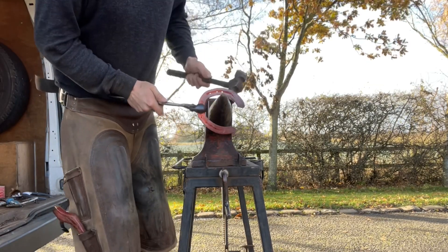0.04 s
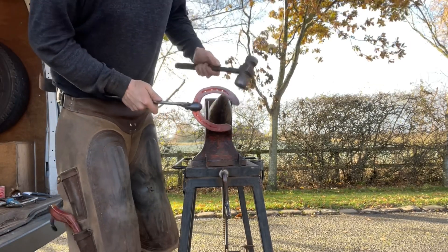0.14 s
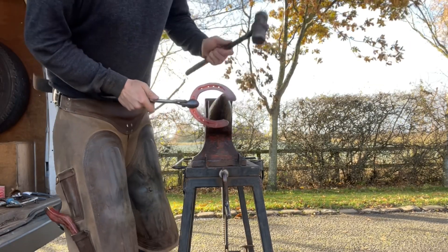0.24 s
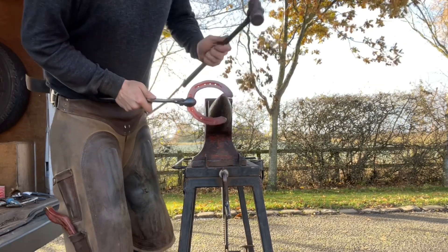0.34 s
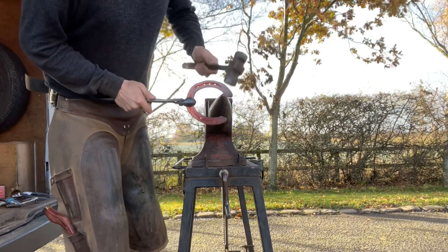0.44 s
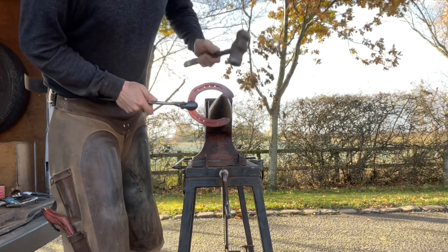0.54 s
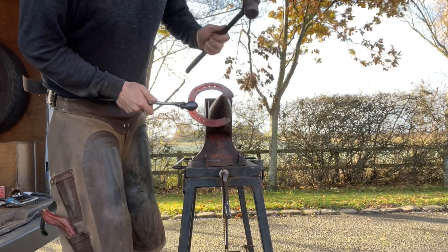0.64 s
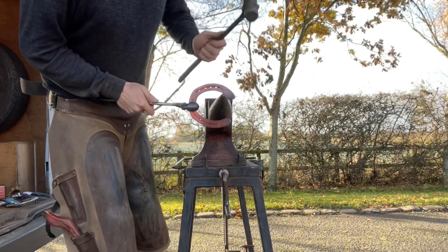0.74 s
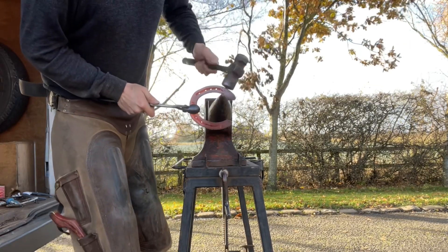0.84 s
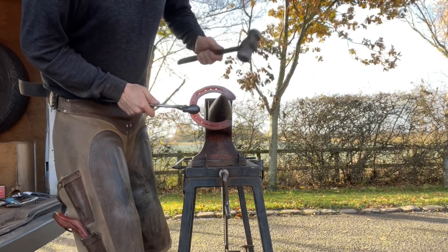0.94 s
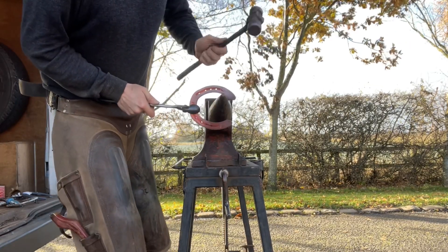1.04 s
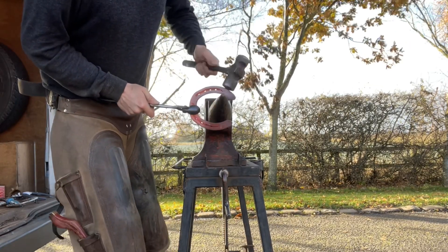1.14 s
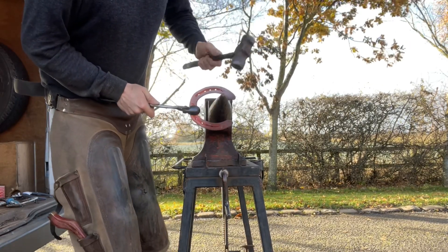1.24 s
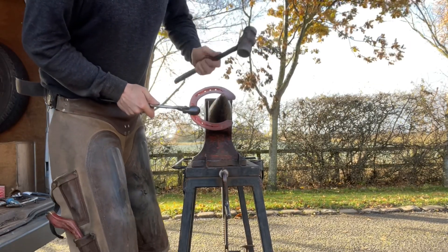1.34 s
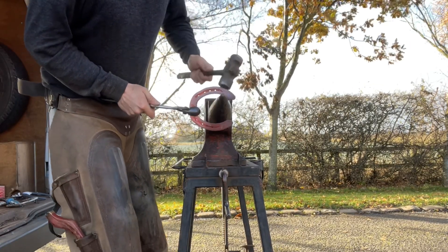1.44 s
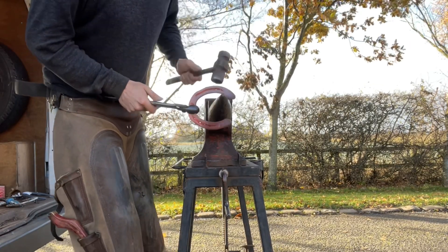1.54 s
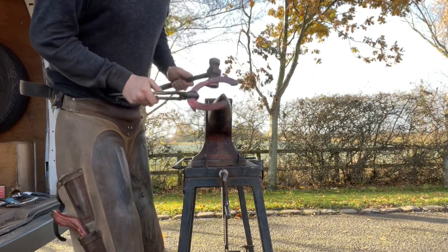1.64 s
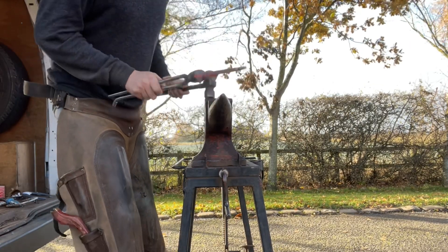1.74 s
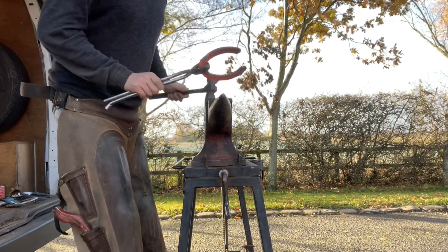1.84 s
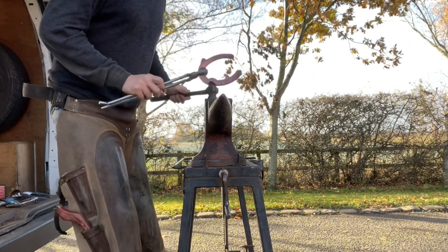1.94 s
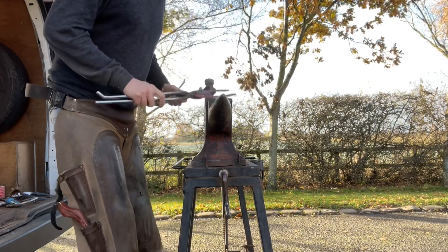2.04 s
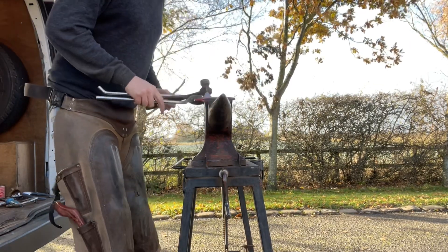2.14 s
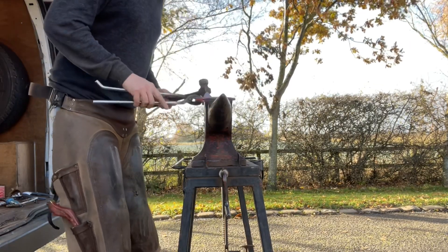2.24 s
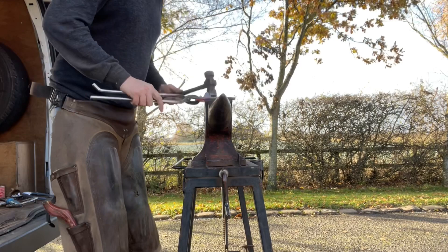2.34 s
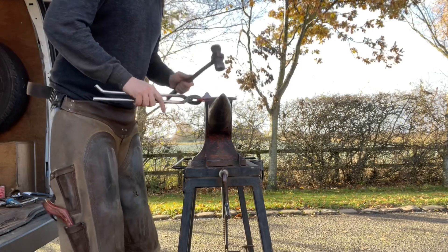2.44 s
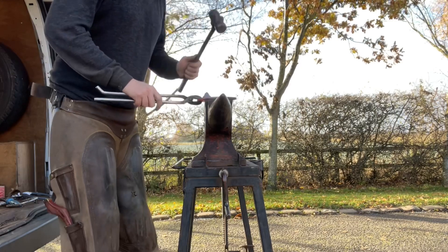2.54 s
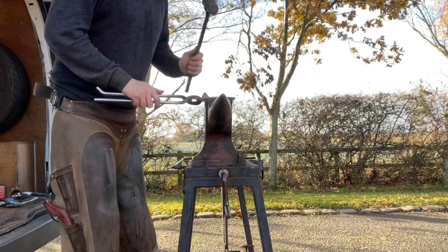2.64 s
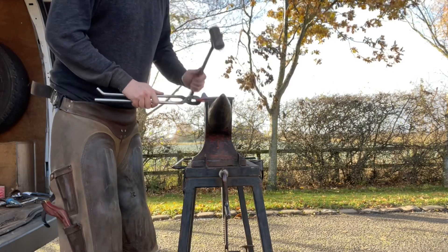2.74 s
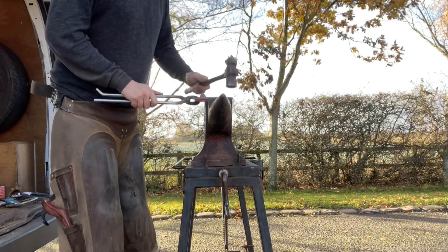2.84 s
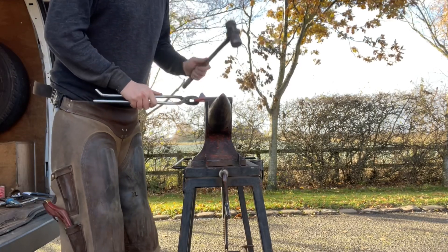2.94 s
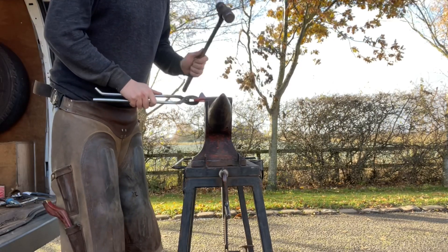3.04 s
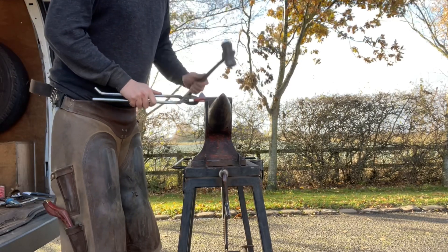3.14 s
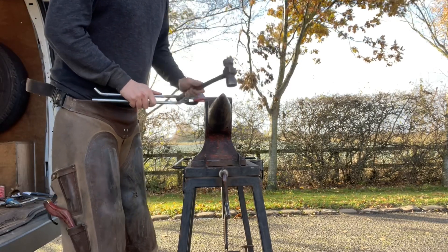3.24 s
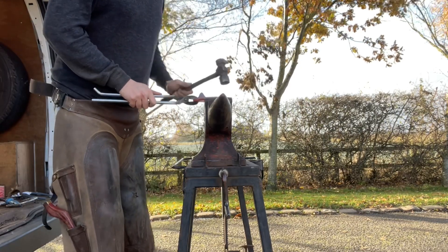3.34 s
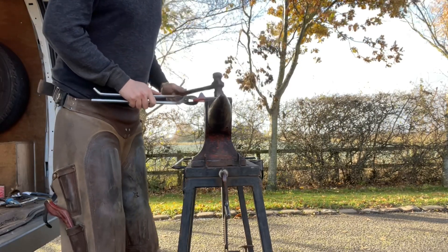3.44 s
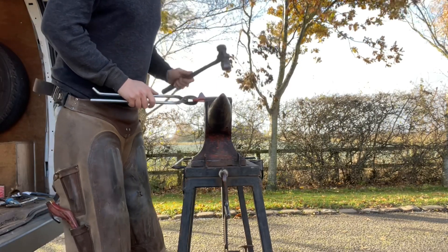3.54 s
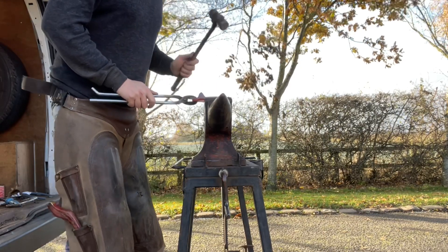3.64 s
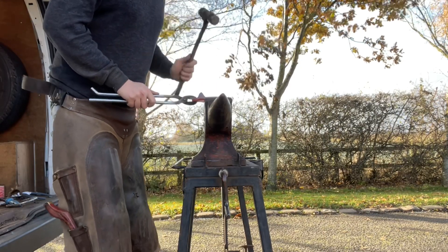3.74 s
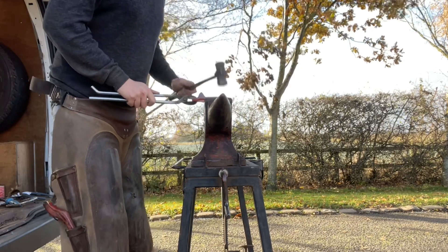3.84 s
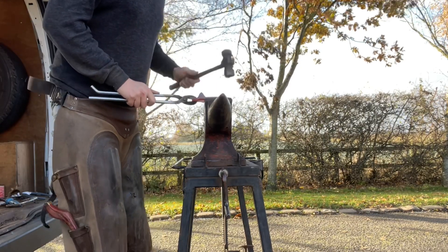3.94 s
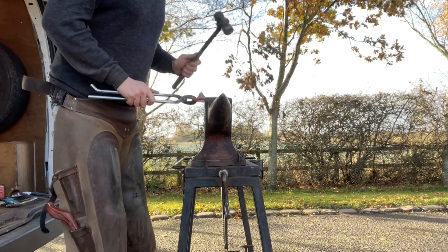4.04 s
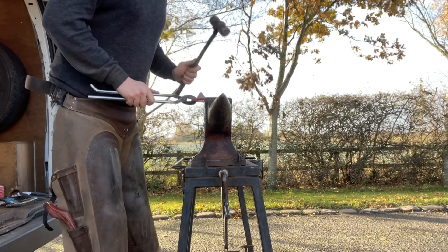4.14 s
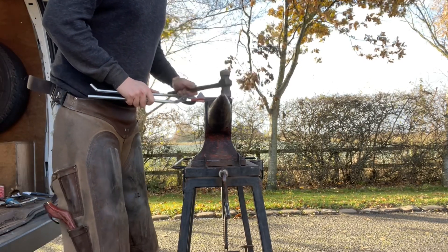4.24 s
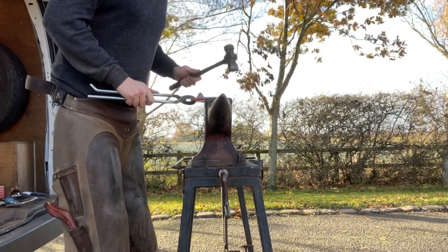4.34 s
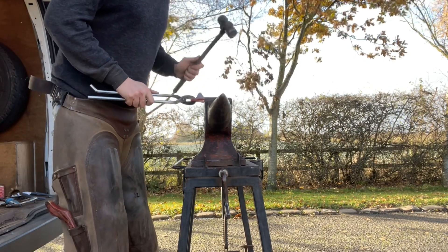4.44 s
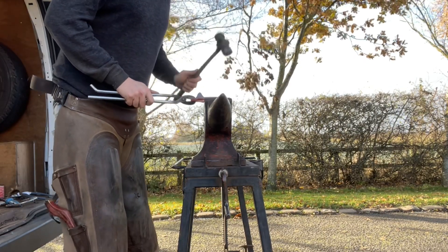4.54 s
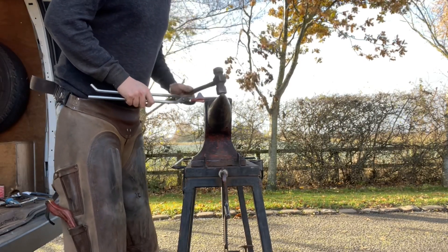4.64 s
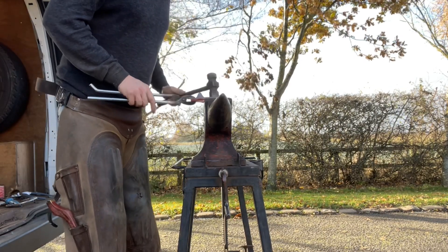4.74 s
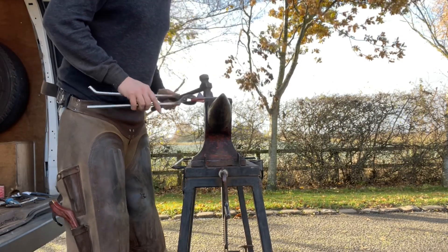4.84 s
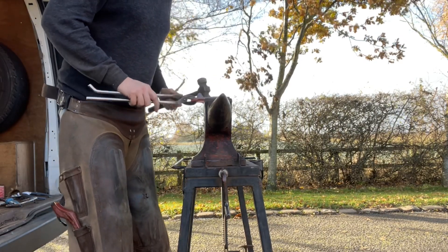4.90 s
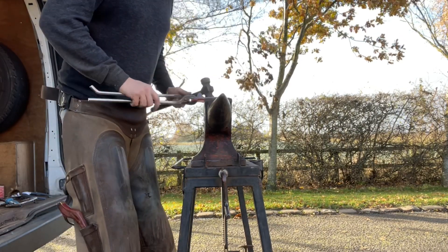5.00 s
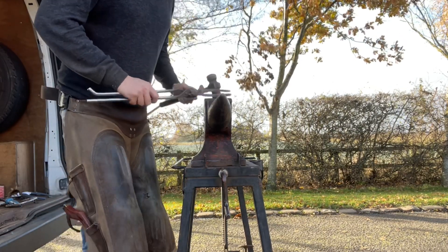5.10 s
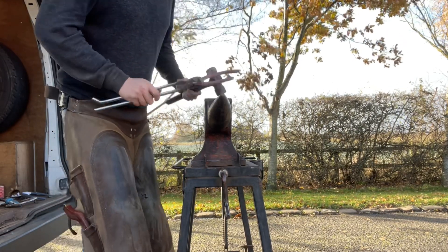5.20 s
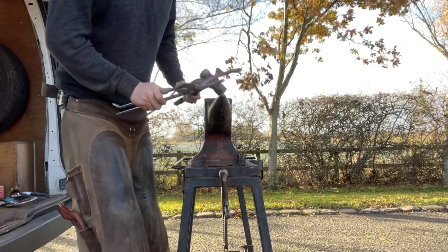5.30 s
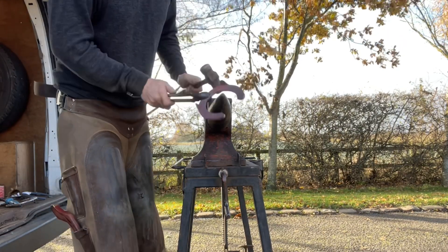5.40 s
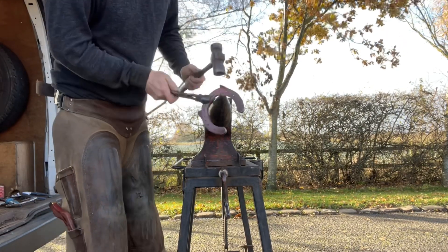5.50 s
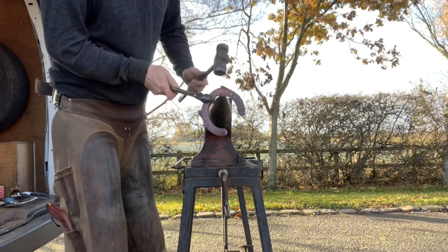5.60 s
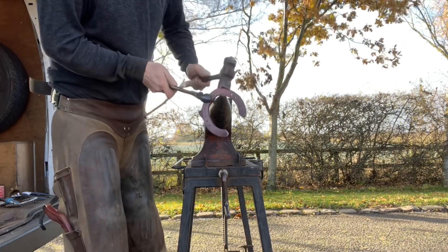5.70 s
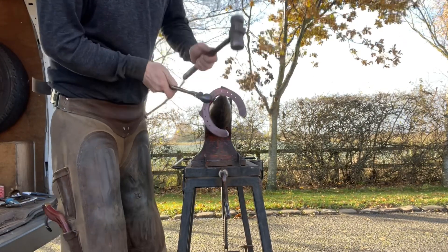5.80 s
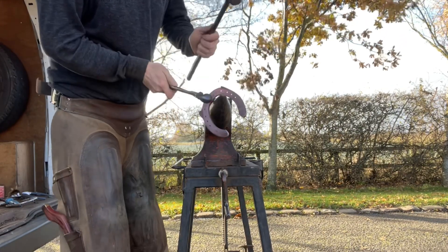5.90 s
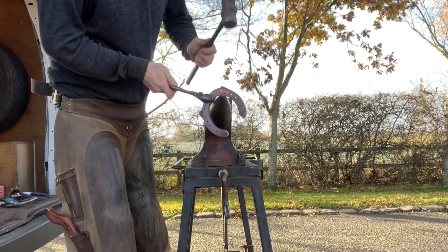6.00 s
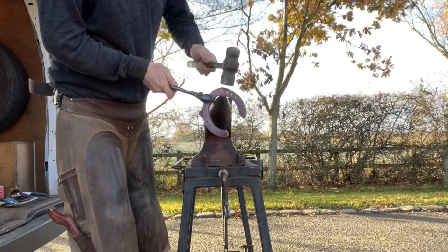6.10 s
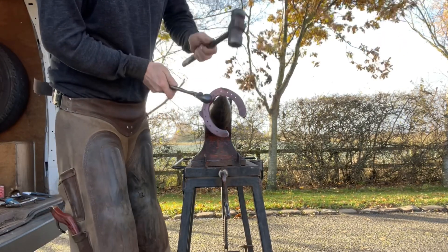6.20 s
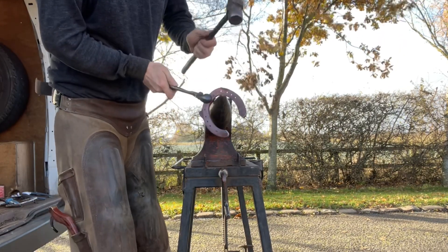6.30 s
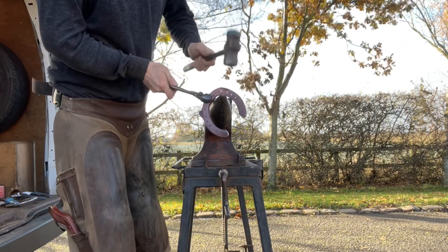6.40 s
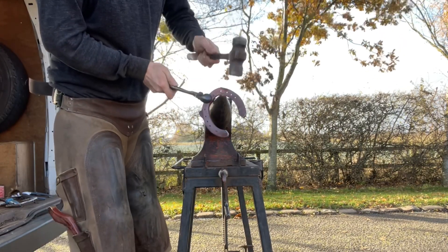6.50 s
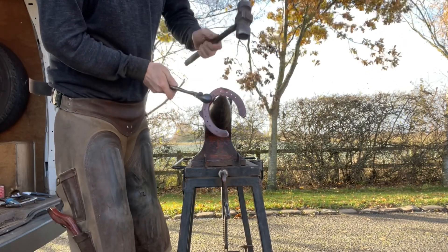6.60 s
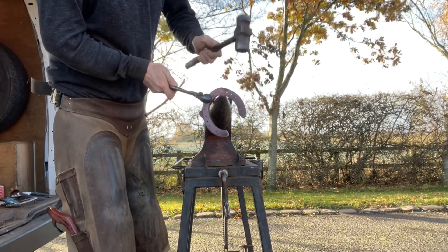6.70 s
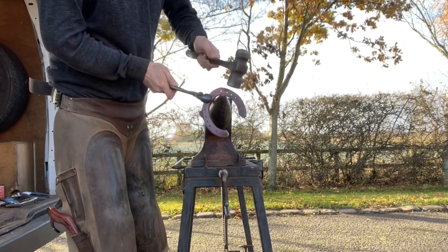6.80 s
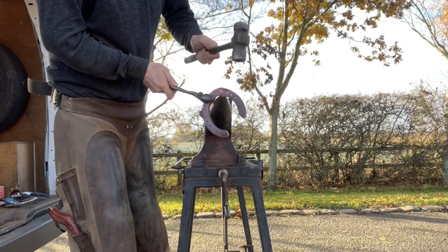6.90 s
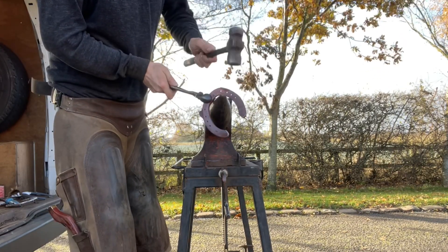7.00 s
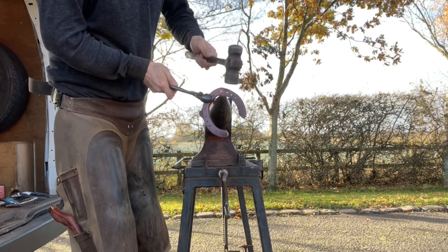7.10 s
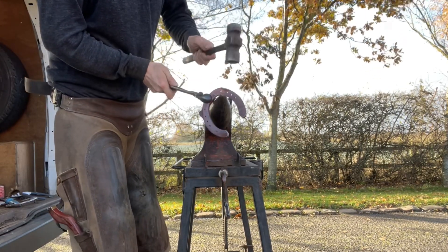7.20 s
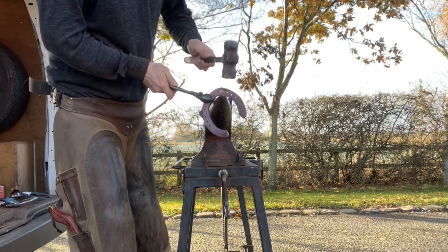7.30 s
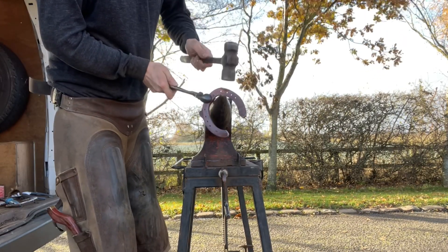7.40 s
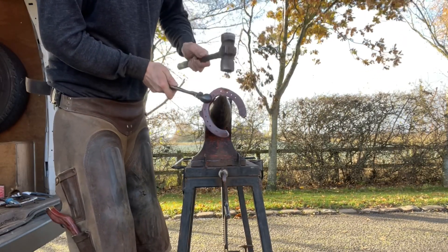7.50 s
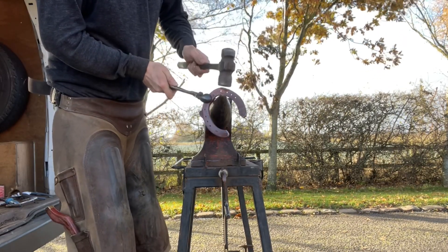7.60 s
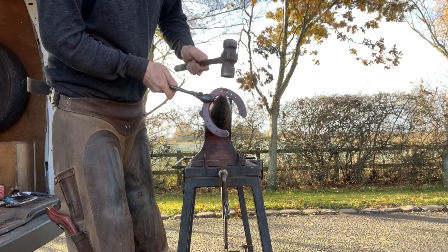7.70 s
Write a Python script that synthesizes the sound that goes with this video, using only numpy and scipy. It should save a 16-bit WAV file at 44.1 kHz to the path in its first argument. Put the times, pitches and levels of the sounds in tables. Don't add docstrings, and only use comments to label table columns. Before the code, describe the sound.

A steel hammer cracks against a soft hot shoe, the anvil ringing briefly around each hit. Four blows, a fast dwindling bounce on the bare face, small clinks of tongs, six hard sharp blows, a cluster of bright pinging taps, then seven steadier blows that get lighter. Open yard beside a van gives quick reflections and a short tail; low wind gusts buffet the nearby stereo phone over faint leaves.

```python
import sys
import numpy as np
from scipy import signal
from scipy.fft import rfft, irfft, next_fast_len
from scipy.io import wavfile
from scipy.ndimage import uniform_filter1d, minimum_filter1d

SR = 44100
rng = np.random.default_rng(int(sys.argv[2]) if len(sys.argv) > 2 else 0)


def transcribe(u):
    v = np.clip(np.atleast_2d(u).T, -1, 1)
    q = np.round(v * 32767).astype(np.int16)
    wavfile.write(sys.argv[1], SR, q)


def nominal_scale(level):
    x = np.asarray(level, float) / 20
    return 10 ** x


N = 341775

# time [s], buffet level [dB].
BREEZE = [(0, -54), (1.05, -59.5), (1.5, -48), (2.05, -49.5), (2.5, -53), (2.82, -56.5), (3.1, -48),
          (3.42, -57), (3.52, -59), (3.85, -49.5), (4.35, -54.5), (4.7, -42), (5.35, -55), (5.66, -45),
          (5.76, -77.5), (6.05, -58), (6.35, -52), (7.75, -57)]


def evened(x):
    return x / np.sqrt(np.mean(x ** 2) + 1e-20)


def read(points, hz):
    f, value = np.transpose(points)
    return np.interp(np.log(hz + 1), np.log(f + 1), value)


def add(mix, start_s, sound):
    part = mix[round(start_s * SR):][:len(sound)]
    part += sound[:len(part)]


def coloured(x, gain):
    size = next_fast_len(x.shape[-1])
    return irfft(rfft(x, size) * gain(np.fft.rfftfreq(size, 1 / SR)), size)[..., :x.shape[-1]]


def ring(pitches_hz, modes, t, lasting, scatter_db, detune=0, hold_s=0):
    hz = np.c_[pitches_hz]
    db, t60_s = np.transpose(modes)[:, :, None]
    spot, sign, grip = rng.standard_normal((3, len(modes), 1))
    sign[:2] = 1
    level = nominal_scale(db + scatter_db * spot - 60 * np.maximum(t - hold_s, 0) / (t60_s * lasting))
    tones = np.sign(sign) * level * np.sin(2 * np.pi * hz * (1 + detune * grip) * t)
    return tones.sum(0) * np.cos(np.pi / 2 * t / t[-1]) ** 2


def strikes():
    # start [s], crack [dB], anvil [dB], heel [dB], bare face [dB].
    first_round = [
        (0.473, -18.5, -54, -79, -56),
        (0.863, -18, -32.5, -72, -52),
        (1.168, -17, -48, -36.5, -41),
        (1.434, -14.5, -33, -25.5, -32.5),
    ]
    last_round = [
        (5.708, -20.5, -21.5, -37, -29.5),
        (6.117, -13.5, -36, -49, -60),
        (6.472, -13, -38.5, -56.5, -30.5),
        (6.812, -16, -35, -32.5, -62),
        (7.093, -17.5, -42, -48, -50),
        (7.367, -22, -49, -42, -39),
        (7.622, -25, -34, -45, -43),
    ]
    flat_round = [
        (2.83, -7.5, -34, -55, -38),
        (3.207, -5.5, -34, -21.5, -42),
        (3.452, -12, -32, -20, -20.5),
        (3.889, -5.5, -31, -43.5, -24),
        (4.26, -8, -31.5, -26.5, -28.5),
        (4.635, -9, -34.5, -44.5, -40.5),
    ]
    bounces = [
        (1.736, -16.5, -44, -48, -53),
        (1.829, -18.5, -43.5, -30, -22.5),
        (1.889, -24.5, -43, -41, -31.5),
        (1.939, -25.5, -55, -38, -32),
        (1.982, -27.5, -49, -65, -62),
        (2.016, -31.5, -77, -65, -65),
        (2.043, -35, -49, -66, -63),
    ]
    taps = [
        (0.072, -14.5, -35, -30.5, -33),
        (4.805, -15.5, -41.5, -20, -13),
        (4.929, -15.5, -36, -25, -20.5),
        (5.026, -20.5, -38.5, -60, -77),
        (5.302, -15, -34, -35.5, -71),
        (5.393, -25.5, -41.5, -36, -59),
        (5.473, -28.5, -40.5, -41.5, -56),
    ]
    # brightness [dB], rattle against crack [dB], rattle brightness [dB],
    # iron against dull body [dB], anvil ring factor.
    kinds = [
        (-38.5, -22, -9.5, -23.5, 0.66),
        (-39, -28.5, -4.5, -14, 0.56),
        (-26.5, -39, 12, -30.5, 0.81),
        (-47, -30, 2, -36, 2.2),
        (-42, -31.5, 8, -24, 0.85),
    ]
    # rattle length [s], stand knock [dB], horn clang against crack [dB], rise [s].
    settling = [
        (0.26, -12, -7, 0.0025),
        (0.72, -10.5, 0.5, 0.0034),
        (.4, -27, -6.5, 0.001),
        (0.32, -17, -15, 0.0019),
        (0.078, -18.5, -6.5, 0.0023),
    ]
    # start [s], waist [dB], throat [dB], step [dB],
    # extra brightness [dB].
    spots = [(0.0677, -26.5, -51, -40, -9), (0.4724, -34.5, -47, -58, 1), (0.8649, -38, -46, -39, 0),
             (1.1677, -45, -72, -59.5, -6), (1.4321, -46.5, -46, -42, 7.5), (1.7365, -37, -57, -38, 9),
             (1.8297, -52, -40.5, -32.5, 19.5), (1.8881, -54, -55, -35, -5), (1.9375, -44, -53, -45, -6),
             (1.9814, -55, -60, -63, -9), (2.0154, -59, -61, -64, -7), (2.0423, -48, -60, -56, -3),
             (2.8284, -38, -34.5, -29, -2), (3.2056, -37.5, -41, -46, -7), (3.4514, -41.5, -35, -33, 8),
             (3.8861, -29.5, -47.5, -41.5, -2), (4.2572, -45, -49, -36, -1.5),
             (4.6319, -42, -52, -43.5, -1), (4.8025, -49, -49.5, -28, 20),
             (4.9277, -37.5, -33.5, -27, 14.5), (5.0254, -40, -48.5, -53, -3.5),
             (5.3009, -30, -53, -54.5, 0), (5.3924, -40, -72, -56.5, -17), (5.4745, -43, -67, -67, -2.5),
             (5.7059, -38, -55, -35, 23.5), (6.1164, -31.5, -59.5, -63, -11), (6.4692, -29.5, -48, -49, -5),
             (6.8129, -41, -55, -53, 0), (7.0898, -33, -61, -60, -3), (7.3642, -46, -58, -56, 4),
             (7.6201, -50.5, -64, -63, 0)]
    # start [s], dull body [dB], anvil pitch [Hz],
    # ring factor, lower partner [dB].
    loads = [(0.07, -24, 2140, 0.82, -7), (0.474, -24, 2220, 1.4, -2), (0.861, -28, 2166, 0.56, -13),
             (1.167, -25, 2170, 0.92, 3), (1.433, -19.5, 2150, 0.53, 11.5), (1.736, -28, 2194, 0.89, 9.5),
             (1.827, -35, 2190, 0.6, -13), (1.891, -34, 2194, 0.8, -15), (1.937, -38, 2170, 1.01, 0),
             (1.981, -39, 2160, 0.76, 4), (2.016, -35, 2200, 1.01, 2), (2.042, -34, 2160, 1, -22),
             (2.828, -14, 2190, 0.7, -11), (3.205, -16.5, 2195, 1.1, 4.5), (3.452, -19.5, 2180, 0.82, 2),
             (3.888, -24, 2142, 0.67, -3), (4.258, -24.5, 2166, 0.87, 0.5), (4.634, -20.5, 2167, 1, 7),
             (4.802, -35.5, 2170, 0.93, -5), (4.928, -38.5, 2190, 0.94, -2.5),
             (5.025, -29, 2182, 0.94, -18), (5.3, -30, 2176, 1.1, -6), (5.392, -23.5, 2188, 0.72, 2),
             (5.472, -34, 2182, 0.83, 4), (5.708, -36.5, 2186, 0.85, 4.5), (6.115, -22, 2140, 0.77, -4),
             (6.47, -26.5, 2124, 0.81, -1), (6.808, -24.5, 2167, 0.65, -6), (7.091, -25, 2120, 0.65, 10.5),
             (7.365, -32, 2187, 1.4, 10.5), (7.622, -31.5, 2164, 0.65, -14)]
    # start [s], edge of the face [dB], extra horn clang [dB].
    glances = [(0.0707, -50, -2), (0.4733, -52, -8), (0.8649, -51, -2), (1.1702, -45, -5),
               (1.4336, -45, -8), (1.7379, -27, -9), (1.8282, -32, -2), (1.8881, -47, -4),
               (1.9385, -60.5, 0), (1.9784, -64, -1), (2.0154, -71, -3), (2.0424, -64, 6),
               (2.8265, -41, -2), (3.2041, -46.5, -3), (3.4511, -36, 1.5), (3.8851, -31, -3),
               (4.2597, -39, 2), (4.6324, -39, 1.5), (4.805, -32.5, 1.5), (4.9284, -39, 0.5),
               (5.026, -57, -4), (5.2989, -43.5, -7.5), (5.3924, -66.5, -1.5), (5.471, -65, 3),
               (5.7064, -41, -5), (6.1164, -55, 0), (6.4692, -42, -1.5), (6.8134, -49, 3),
               (7.0918, -47, 0.5), (7.3664, -60, -9), (7.6224, -56, -4)]
    rounds = first_round, last_round, flat_round, bounces, taps
    rows = sorted((*row, *kind, settle) for rows, kind, settle in zip(rounds, kinds, settling) for row in rows)
    return zip(rows, spots, loads, glances)


def blows():
    # frequency [Hz], density [dB per Hz].
    crack_spectrum = [(88, -53.5), (150, -15), (1420, -2.5), (1900, -7), (2180, -1.5), (3290, -7.5),
                      (4410, -6.5), (6300, -12), (8560, -24), (11500, -31.5), (16000, -50.5)]
    rattle_spectrum = [(200, -6), (500, 1.5), (1500, 5), (2200, 0), (4000, -7), (6000, 0.5), (7500, -12.5),
                       (14000, -25), (15500, -42)]
    # level [dB], t60 [s]. Bare face, hot iron, horn, stand.
    face_hz = [5658, 5722, 5478, 4135, 3815, 3680, 6120, 6810, 8155, 9600, 11180, 3020, 1700]
    face_modes = [(0, .06), (-8, .05), (-11, .05), (-16, .035), (-24, .05), (-24, .05), (-10, .035),
                  (-24, .05), (-29, .04), (-30, .04), (-34, .05), (-13, .02), (-12, .02)]
    iron_hz = [1960, 1550, 1780, 1436, 1060, 720]
    iron_modes = [(-2, 0.1), (-5.5, 0.15), (-4.5, 0.015), (-9.5, .05), (-13.5, 0.12), (5.5, 0.11)]
    clang_hz = [2170, 2245, 2060, 2330, 2445, 2120]
    clang_modes = [(-9.5, 0.02), (-21.5, 0.052), (-17, 0.011), (-21, 0.0083), (-18, 0.046), (-11.5, 0.017)]
    stand_hz = [705, 600, 340]
    stand_modes = [(0, .022), (-4, .025), (-6, .04)]
    lead_s = .001
    press_s = .007
    edge_hz, edge_t60_s = 6095, 0.054
    out, t = np.zeros((3, N)), np.arange(SR // 3) / SR
    short = t[:SR // 8]

    def treble(hz):
        return np.clip(np.log2((hz + 1) / 3000) / 2.0, 0, 1)

    for k, (row, spot, load, (_, edge_db, glance_db)) in enumerate(strikes()):
        ring_s, crack_db, _, _, face_db, bright_db, rattle_db, fizz_db, iron_db, _, settle = row
        rattle_s, knock_db, clang_db, rise_s = settle
        stance = out[k % 3]
        ring_s -= lead_s
        start_s = ring_s - .0015
        dull_db = load[1] + 12
        iron_db += dull_db
        rise = np.sin(np.pi / 2 * np.minimum(t / rise_s, 1)) ** 2
        bright_db += 0.32 * (crack_db + 15.5) + spot[4]
        top_hz = 17500 + 220 * crack_db

        def colour(hz):
            tilt_db = (bright_db + 30.5) * treble(hz)
            return nominal_scale(read(crack_spectrum, hz) + tilt_db) / (0.5 + (hz / top_hz) ** 12)

        crack, smear = coloured(rng.standard_normal((2, 2048)), colour)
        click = coloured(signal.unit_impulse(512, 'mid'), colour)
        add(stance, ring_s - 256 / SR, click / click.max() * nominal_scale(crack_db - 1))
        crack_fade_db = crack_db - 7.0 - 60 * (t[:2048] / 0.024) ** 1.423
        add(stance, start_s, evened(crack) * nominal_scale(crack_fade_db) * rise[:2048])
        smear = coloured(evened(smear), lambda hz: 1 / (1 + (hz / 7000) ** 12))
        smear = smear * nominal_scale(crack_db - 24.0 - 60 * t[:2048] / 0.03)
        add(stance, start_s - 1024 / SR, smear[1023::-1])

        noise, lumps = rng.standard_normal((2, len(t)))
        rattle = evened(coloured(noise, lambda hz: nominal_scale(read(rattle_spectrum, hz) + fizz_db * treble(hz))))
        lumpy_db = 2.7 * evened(uniform_filter1d(lumps, size=300))
        ending = 1 / (1 + (t / rattle_s) ** 6)
        rattle *= nominal_scale(crack_db + rattle_db + lumpy_db - 60 * t / .45)
        add(stance, start_s, rattle * ending * rise * np.cos(1.5 * np.pi * t))

        body = nominal_scale(face_db) * ring(face_hz, face_modes, short, 0.75, 1.5)
        body += nominal_scale(iron_db) * ring(iron_hz, iron_modes, short, 0.22, 1.9, detune=0.019)
        clang = ring(clang_hz, clang_modes, short, 0.35, 0.98, detune=0.0054, hold_s=press_s)
        body += nominal_scale(crack_db + clang_db + glance_db) * clang
        body += nominal_scale(dull_db + knock_db) * ring(stand_hz, stand_modes, short, 0.89, 1.5, detune=0.061)
        body += nominal_scale(edge_db - 60 * short / edge_t60_s) * np.sin(2 * np.pi * edge_hz * short)
        add(stance, ring_s, body * rise[:len(short)])
    return out


def anvil_ringing():
    # level [dB], t60 [s]. Anvil pair, heel, hum, spot.
    anvil_modes = [(7.5, 0.26), (1.5, 0.11)]
    heel_hz = [4503, 4425, 4700]
    heel_modes = [(-1, .085), (-12, .1), (-20, .3)]
    hum_hz = [2099, 1925, 2235]
    hum_modes = [(-48.5, 3.8), (-43.5, 1.1), (-53.5, 0.35)]
    spot_hz = [1957, 3803, 4125]
    spot_modes = [(-4, 0.17), (9.5, 0.073), (1.5, 0.11)]
    partner_gap_hz, rise_s = 28.2, .0012
    out, t = np.zeros(N), np.arange(SR // 2) / SR
    rise = np.sin(np.pi / 2 * np.minimum(t / rise_s, 1)) ** 2
    for row, spot, load, _ in strikes():
        start_s, crack_db, anvil_db, heel_db, *_, lasting, _ = row
        *_, pitch_hz, factor, partner_db = load
        (upper_db, upper_s), (lower_db, lower_s) = anvil_modes
        pair = [(upper_db, upper_s), (lower_db + partner_db, lower_s)]
        others = np.zeros(len(t))
        for level_db, hz, (db, t60_s) in zip(spot[1:], spot_hz, spot_modes):
            others += nominal_scale(level_db + db - 60 * t / t60_s) * np.sin(2 * np.pi * hz * t)
        anvil = nominal_scale(anvil_db) * ring([pitch_hz, pitch_hz - partner_gap_hz], pair, t,
                                     np.clip(lasting * factor, .2, 3), 0.52, detune=0.00079)
        heel = nominal_scale(heel_db) * ring(heel_hz, heel_modes, t, 1.0, 0.75)
        hum = nominal_scale((crack_db + anvil_db) / 2 + 6.5) * ring(hum_hz, hum_modes, t, 0.79, 2.9)
        drift = uniform_filter1d(uniform_filter1d(rng.standard_normal((2, len(t))), size=450), size=100)
        waver = nominal_scale(3.76 * evened(drift))
        add(out, start_s, (anvil * waver[0] + heel + hum * waver[1] + others * np.sqrt(waver[1])) * rise)
        flutter = evened(np.convolve(rng.standard_normal(800), np.hanning(60), 'same'))
        smear = anvil[:800] * flutter * nominal_scale(-10.5 - 60 * t[:800] / 0.036)
        add(out, start_s - 800 / SR, smear[::-1])
    return out


def hammer_singing():
    # blow [s], delay to loudest [s], peak level [dB], fade [dB per s].
    swings = [(0.476, 0.033, -51.5, 154), (1.168, .03, -61.5, 129), (1.432, 0.019, -47.5, 166),
              (2.828, 0.013, -39.5, 130), (3.206, 0.027, -50, 90), (3.452, 0.06, -45, 60.5),
              (3.886, .01, -57, 56), (4.263, 0.027, -66, 38.5), (4.805, .01, -45.5, 69),
              (4.931, 0.1, -40, 205), (5.301, 0.1, -52.5, 121), (5.719, 0.038, -67, 95)]
    # offset [Hz], level [dB], extra fade [dB per s].
    second_tone = (46, -7, 80)
    gap_hz, second_db, extra_fade = second_tone
    head_hz, doppler_hz, swell_db_per_s, flutter_scale_db = 4651, 4, 67, 1.6
    out, t = np.zeros(N), np.arange(0, 0.66, 1 / SR)
    for start_s, turn_s, db, fade in swings:
        swing_db = db - np.where(t < turn_s, swell_db_per_s * (turn_s - t), fade * (t - turn_s))
        wander = evened(uniform_filter1d(rng.standard_normal(len(t)), size=1500))
        pitch_hz = head_hz + doppler_hz * wander
        flutter_db = flutter_scale_db * evened(uniform_filter1d(rng.standard_normal(len(t)), size=600))
        tone = np.sin(2 * np.pi * np.cumsum(pitch_hz) / SR)
        second = np.sin(2 * np.pi * np.cumsum(pitch_hz + gap_hz) / SR)
        tone += nominal_scale(second_db - extra_fade * t) * second
        tone *= nominal_scale(swing_db + 5.5 + flutter_db)
        add(out, start_s, tone * np.minimum(t / .004, 1) * np.cos(np.pi / 2 * t / t[-1]))
    return out


def clinks():
    # start [s], level [dB], pitch [Hz], width [Hz], length [s]. The first row is an earlier blow
    touches = [(0, -48.5, 2450, 2440, 0.14), (0.141, -54.5, 2130, 173, 3.8), (1.637, -48, 1350, 900, 0.13),
               (1.663, -55, 5970, 880, 0.044), (2.074, -27, 3300, 935, 0.027),
               (2.097, -25, 2780, 600, 0.04), (2.13, -38, 5700, 900, 0.032),
               (2.166, -50, 1630, 81.4, 0.013), (2.216, -51, 1620, 82.5, 0.12),
               (2.256, -64, 5130, 40, 0.12), (2.329, -48.5, 4720, 505, 0.033), (2.332, -58, 1850, 198, .5),
               (2.358, -48.5, 5200, 302, 0.013), (1.861, -45.5, 1700, 1000, .8),
               (2.498, -58, 1950, 197, 0.25), (2.524, -42.5, 5400, 710, 0.033),
               (3.642, -49, 1040, 350, 0.37), (0.56, -52, 1530, 91, 0.12), (6.21, -46.5, 1520, 60, 0.16),
               (6.537, -45, 1570, 200, 0.028)]
    out, t = np.zeros(N), np.arange(SR // 3) / SR
    for start_s, db, pitch_hz, width_hz, length_s in touches:
        hiss_db = -22 - 8 * np.log2(length_s / 0.18)

        def colour(hz):
            scrape = (hz / 3000) ** 0.24 / (1 + (hz / 6500) ** 4) * hz / (hz + 700)
            return nominal_scale(hiss_db) * scrape + 1 / (1 + ((hz - pitch_hz) / width_hz) ** 2)

        puff = evened(coloured(rng.standard_normal(len(t)), colour)) * np.cos(np.pi / 2 * t / t[-1])
        add(out, start_s, puff * nominal_scale(db - 60 * t / length_s) * np.minimum(12 * t / length_s, 1))
    return out


def yard(stances, tones, tail_db=-12, tone_send_db=-8):
    # frequency [Hz], t60 [s].
    decay = [(250, 0.24), (1000, 0.67), (3000, 0.45), (6000, 0.25), (9000, 0.23), (13000, 0.92)]
    # frequency [Hz], level [dB].
    tail_colour = [(300, 15), (1000, -0.2), (1750, 1), (2170, -2.5), (2800, -0.5), (4300, 9.5), (6500, 3.5),
                   (9000, 1), (13000, -26), (15000, 4.5)]
    # delay [s], level [dB].
    echoes = [(.0012, -13), (.0031, -14), (.0058, -8), (.0085, -10), (.013, -11.5), (.021, -20),
              (.031, -19.5)]
    # frequency [Hz], level [dB].
    lean = [(200, .5), (500, 2.6), (1000, 3.7), (2000, 4.1), (4000, 3.7), (8000, 1.6), (11000, 0)]
    # frequency [Hz], phase of left against right [rad].
    turn = [(300, -.9), (650, -1.1), (1400, -.7), (2300, -.95), (4300, -1.6), (5500, -1.3), (7500, -2.1),
            (9500, -2.2), (11500, -.1)]
    right_path = 1.09
    taps = np.zeros((3, 2, SR // 2))
    grid = np.arange(300, SR // 2 - 10, 10)
    at = grid + rng.integers(0, 10, (3, 2, len(grid)))
    np.put_along_axis(taps, at, rng.choice([-1., 1.], at.shape), 2)
    taps[:, 1] = .2 * taps[:, 0] + .98 * taps[:, 1]
    hz, t, z = signal.stft(taps, SR, nperseg=256)
    shape = nominal_scale(read(tail_colour, hz)[:, None] - 60 * t / read(decay, hz)[:, None])
    tail = signal.istft(z * shape, SR, nperseg=256)[1]
    tail *= nominal_scale(tail_db) / np.linalg.norm(tail[0, 0])

    near = np.zeros((2, 2048))
    near[:, 0] = 1
    for k, (delay_s, db) in enumerate(echoes):
        near[[0, 1], [round(delay_s * SR), round(delay_s * SR * right_path)]] = (-1) ** k * nominal_scale(db)
    near /= np.linalg.norm(near[0])
    direct = signal.oaconvolve(stances.sum(0)[None], near, axes=1)[:, :N]
    sent = stances + nominal_scale(tone_send_db) * tones * np.c_[[0, 1, 0]]
    both = direct + tones + signal.fftconvolve(sent[:, None], tail, axes=2).sum(0)[:, :N]
    side = np.array([[.5], [-.5]])
    return coloured(both, lambda hz: nominal_scale(side * read(lean, hz)) * np.exp(1j * side * read(turn, hz)))


def hiss(spectrum, same, patchy_db, size):
    frames, hz = 4 * N // size + 5, np.fft.rfftfreq(size, 1 / SR)
    used = hz[hz < spectrum[-1][0]]
    a, b, c, d, patches = rng.standard_normal((frames, len(used), 5)).T
    patches = evened(uniform_filter1d(uniform_filter1d(patches, size=9, axis=0), size=5, axis=1))
    like = np.clip(read(same, used), -1, 1)[:, None]
    left = a + 1j * b
    z = np.zeros((2, len(hz), frames), complex)
    z[:, :len(used)] = left, like * left + np.sqrt(1 - like ** 2) * (c + 1j * d)
    z[:, :len(used)] *= nominal_scale(read(spectrum, used)[:, None] + patchy_db * patches)
    return evened(signal.istft(z, nperseg=size, noverlap=size * 3 // 4)[1][:, :N])


def wind():
    # peak time [s], buffet [dB], rush above it [dB], length [s].
    gusts = [(0.1, -65, -8, 0.062), (0.5, -51, -2, 0.087), (0.879, -53.5, 9, 0.095), (1.182, -49, 3, 0.073),
             (1.628, -30.5, -66, 0.015), (1.78, -39, -33, 0.32), (2.119, -27, -13.5, 0.08),
             (2.372, -43, -16.5, 0.28), (2.98, -39.5, -8, 0.046), (3.367, -40, -10.5, 0.057),
             (4.202, -36.5, -12.5, 0.056), (4.438, -31.5, -0.5, 0.056), (4.482, -32, -5, .2),
             (4.95, -38, 3.5, 0.096), (5.184, -36.5, -7, 0.054), (5.48, -35.5, -8.5, 0.13),
             (5.598, -32, -1, 0.03), (6.375, -41.5, -2.5, 0.058), (6.488, -36, -6, 0.049),
             (6.674, -43, -10, 0.05), (7.13, -47.5, -8, 0.073), (7.4, -42, -11, 0.13),
             (7.65, -47.5, -3, 0.1)]
    # frequency [Hz], density [dB per Hz].
    buffet_spectrum = [(8.8, -63.5), (15, -19), (56, 6.5), (113, 1.5), (214, -15), (242, -19), (300, -18),
                       (390, -45), (660, -120)]
    rush_spectrum = [(71, -21), (120, -14), (218, -2.5), (340, -8), (404, -9.5), (911, -34.5), (1600, -45),
                     (2080, -88), (3520, -120)]
    flap_spectrum = [(70, -30), (120, -6.5), (160, -13), (210, -11), (330, -32), (600, -68.5)]
    # frequency [Hz], left-right likeness.
    likeness = [(30, 1), (120, 0.58), (300, 0.33), (1000, 0.18)]
    rise_share, gust_shape = 0.29, 1.5
    breeze_rush_db, gust_lean_db = -6, -1
    flap_db, flap_growth = 4, 0.77
    t = np.arange(0, N + 64, 64) / SR
    s, db, rush_db, length = np.transpose(gusts)[:, :, None]
    away = np.where(t < s, (s - t) / rise_share, t - s) / length
    gust = nominal_scale(db - 10.0 * away ** gust_shape) ** 2
    breeze = nominal_scale(np.interp(t, *np.transpose(BREEZE))) ** 2
    total = breeze + gust.sum(0)
    rush = breeze * nominal_scale(breeze_rush_db) ** 2 + (gust * nominal_scale(rush_db) ** 2).sum(0)
    flap = (gust * nominal_scale(rush_db + flap_db + flap_growth * (db + 31.5)) ** 2).sum(0)
    curves = np.sqrt(total), np.sqrt(rush), np.sqrt(flap), gust.sum(0) / total
    low, high, mid, gusty = (np.interp(np.arange(N) / SR, t, c) for c in curves)
    both = low * hiss(buffet_spectrum, likeness, 2.7, size=2048)
    both = both + high * hiss(rush_spectrum, likeness, 5.9, size=512)
    both = both + mid * hiss(flap_spectrum, likeness, 4.2, size=1024)
    return both * nominal_scale(1.89 + np.array([[.5], [-.5]]) * (-0.1 + gust_lean_db * gusty))


def air():
    # frequency [Hz], density [dB per Hz].
    leaves = [(120, -22.5), (200, -25), (391, -11), (511, -17.5), (592, -30.5), (648, -15.5), (872, -17.5),
              (1810, -29.5), (2160, -27.5), (2290, -28.5), (5500, -38.5), (7000, -42.5), (9100, -103),
              (15400, -120)]
    stir_db = 0.23 * (np.interp(np.arange(N) / SR, *np.transpose(BREEZE)) + 56)
    likeness = [(300, 0.2), (3000, 0.38), (10000, 0.79)]  # (Hz, left-right likeness)
    return nominal_scale(-66 + stir_db) * hiss(leaves, likeness, 1.9, size=1024)


def scene():
    stances = blows() + clinks() * np.c_[[1, 0, 0]]
    return yard(stances, anvil_ringing() + hammer_singing()) + wind() + air()


def masked(x):
    limits = (4300, 6200, 9000, 450)
    low_hz, high_hz, top_hz, gap_hz = limits
    mask_db, db_per_khz, soft_db = 34.5, 1.6, 3
    hz, _, z = signal.stft(x, SR, nperseg=1024)
    power = (abs(z) ** 2).mean(0) + 1e-20
    tones = np.where(((hz > low_hz) & (hz < high_hz))[:, None], power, 0)
    above_hz = hz[:, None] - hz[tones.argmax(0)]
    local = abs(uniform_filter1d(power, size=13, axis=0))
    over_db = 10 * np.log10(local / tones.max(0)) + mask_db + db_per_khz * above_hz / 1000
    hidden = (above_hz > gap_hz) & (hz < top_hz)[:, None]
    keep = np.where(hidden, .5 + .5 * np.tanh(over_db / soft_db), 1)
    return signal.istft(z * keep, SR, nperseg=1024)[1][:, :N]


def band_limit(x):
    return signal.sosfilt(signal.butter(12, 16530, fs=SR, output="sos"), x)


def record(dry):
    dry = coloured(dry, lambda hz: hz ** 2 / (hz ** 2 + 44 ** 2))
    power_db = 10 * np.log10(abs(uniform_filter1d((dry ** 2).mean(0), size=300)) + 1e-12)
    fall_db = np.arange(N) * 60. / SR
    over_db = np.maximum(np.maximum.accumulate(power_db + fall_db) - fall_db + 39.5, 0)
    ducked = dry / nominal_scale(0.02 * uniform_filter1d(over_db, size=100))
    ceiling = .28
    room = minimum_filter1d(ceiling / np.maximum(abs(ducked).max(0), ceiling), size=121)
    limited = ducked * uniform_filter1d(uniform_filter1d(room, size=60), size=60)
    held = coloured(limited, lambda hz: 1 / (1 + (hz / 16050) ** 40))
    middle = held.mean(0)
    held = middle + coloured(held - middle, lambda hz: 1 / (1 + (hz / 12300) ** 4))
    return band_limit(masked(held))


dry = scene()
out = record(dry)
transcribe(out)
```